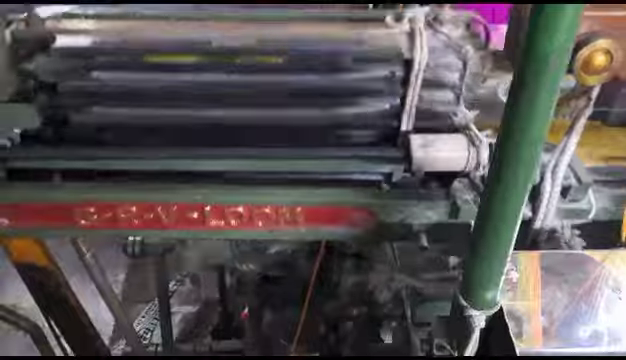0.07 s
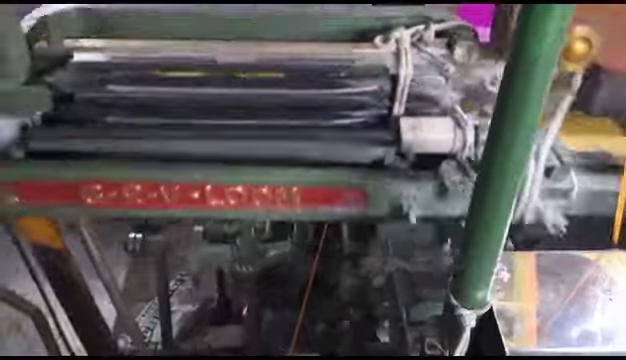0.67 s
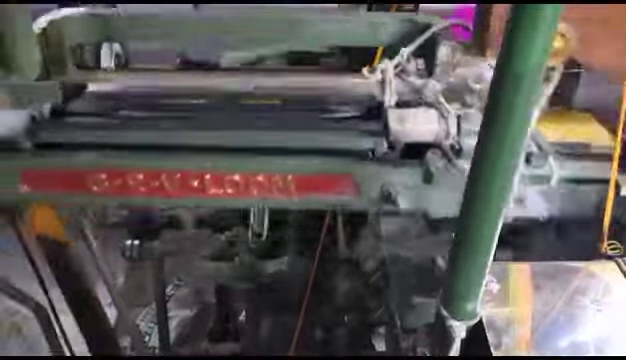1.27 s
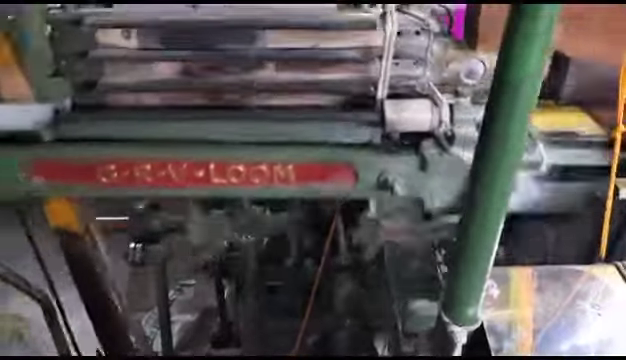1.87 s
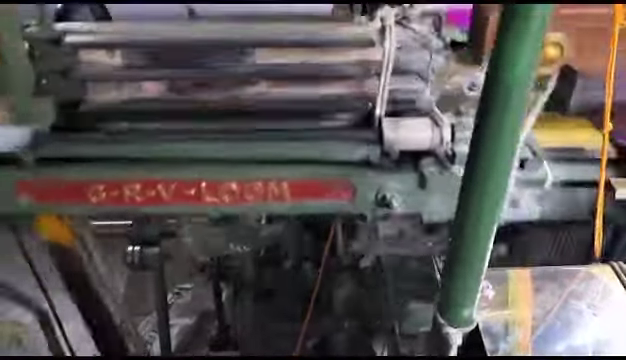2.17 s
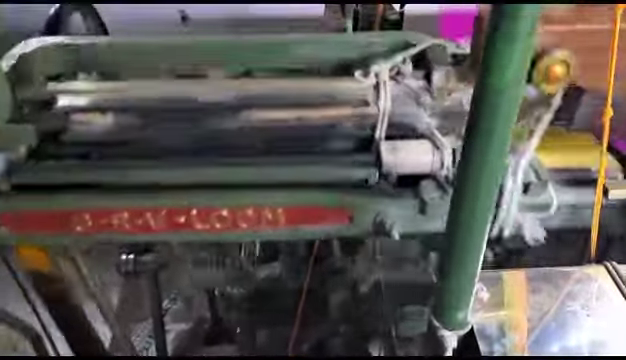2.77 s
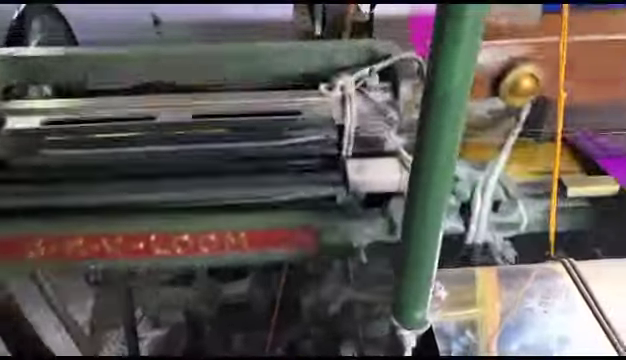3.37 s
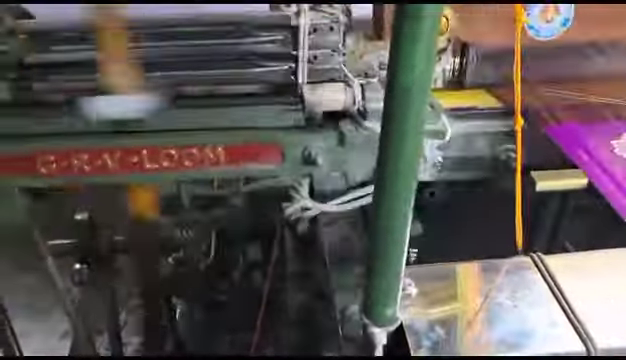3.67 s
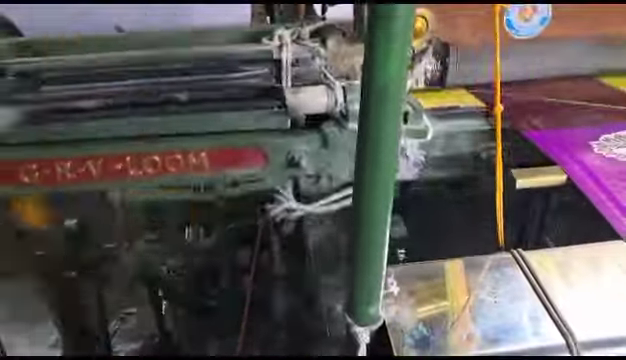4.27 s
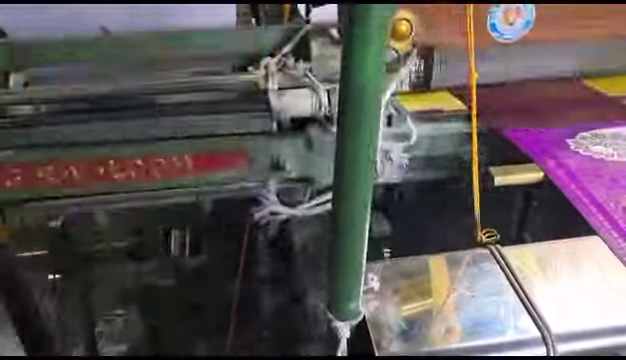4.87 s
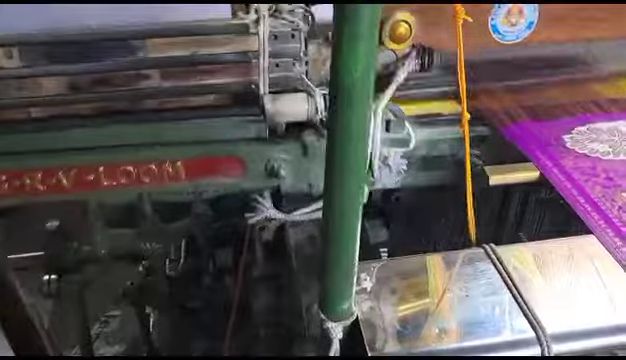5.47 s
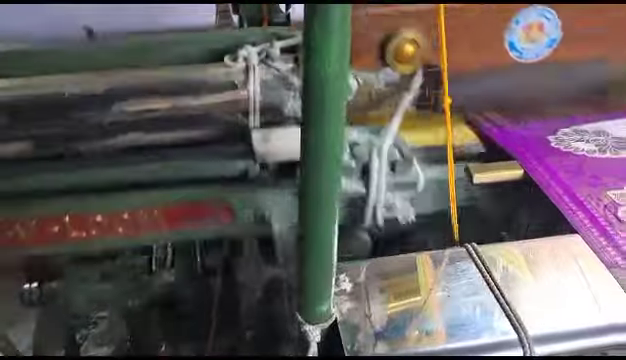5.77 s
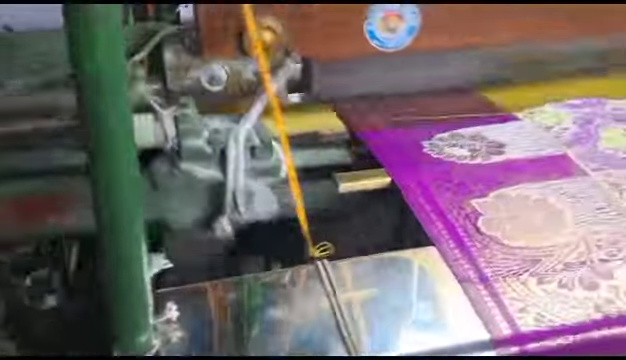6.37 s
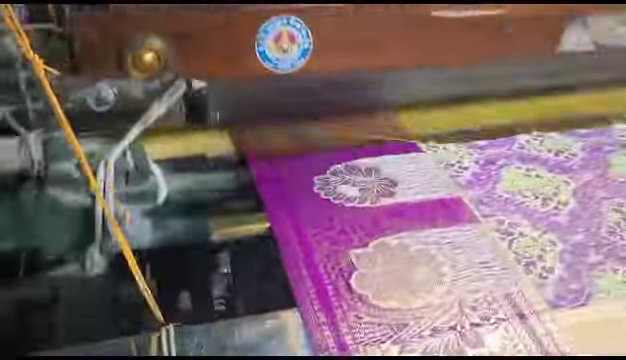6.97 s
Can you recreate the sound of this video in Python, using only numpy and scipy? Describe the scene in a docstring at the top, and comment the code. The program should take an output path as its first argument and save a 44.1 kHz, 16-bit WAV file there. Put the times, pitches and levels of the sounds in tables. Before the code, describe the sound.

A power loom clatters close by in a fast, steady rhythm of metallic clacks and slams over a low machinery rumble.

```python
"""Power loom in a weaving shed

A shuttle loom clatters close by at about 106 picks a minute, between hard walls. Every turn brings a
bright click of the shedding gear, a cam knock, the slam of the picking stick, a latch, and the shuttle's
stop in its box. The gear comes round every three turns and the shuttle changes sides each turn, so the
groove repeats every six. Loose ironwork rattles and rings over the drive's rumble and the shed's din."""
import sys
import numpy as np
from scipy import signal
from scipy.fft import rfft, irfft
from scipy.io import wavfile
from scipy.ndimage import uniform_filter1d

SR = 44100
rng = np.random.default_rng(int(sys.argv[2]) if len(sys.argv) > 2 else 0)


def materialize(psi):
    """Save the field psi as 16-bit PCM at rate SR to the path in sys.argv[1].

    A 1-D psi becomes a single channel; in a 2-D psi each row is a channel.
    """
    bounded = np.clip(np.atleast_2d(psi).T, -1, 1)
    quanta = np.round(bounded * 32767).astype(np.int16)
    wavfile.write(sys.argv[1], SR, quanta)


N = 313992
ROUND_S = 3.386  # six turns of the loom

# slams of the stick: t/s, level/dB, tilt/(dB per octave), crack over tail/dB
PICKS = [(0.366, 3.7, 0.3, -2), (0.924, 3.5, 0.5, 6), (1.4865, 4.3, 0, 1), (2.087, 3.5, -0.3, -11),
         (2.615, 3, -0.75, -2), (3.207, 3.5, -1, -8)]
# their EQ on top of the frame: f/Hz, level/dB
PICK_EQ = [(100, -7.5), (300, -2.2), (800, 1.1), (2000, 0.5), (4200, 3), (7300, 1), (12000, 1.5)]
# stick resonances: f/Hz, width/Hz, lift/dB
PICK_MODES = [(1810, 94, 2.5), (2480, 70, 3.8)]
def picking_stick():
    """The stick slams, throws the shuttle and springs back off its buffer."""
    hits = every(ROUND_S, PICKS + bounces(PICKS, delays_s=.029, gain_db=-5.5, crack_db=-7))
    return blows(hits, PICK_EQ, PICK_MODES, level_db=.17, crack_db=-8.5, crack_s=.01,
                 rise_s=.0014, ring=.97, chatter_db=1.5)


# cam hits: t/s, level/dB, tilt/(dB per octave), crack over tail/dB
KNOCKS = [(0.3154, 2.1, 0.3, 7.5), (0.873, 0.5, 0.2, -2), (1.438, 0.4, 0.8, 9), (2.0415, 1.5, 0.9, -6),
          (2.568, 3, -0.5, -6), (3.162, 3, -0.5, -2)]
# their EQ: f/Hz, level/dB
KNOCK_EQ = [(300, -9), (800, -1.5), (2000, 0), (4200, 3), (7300, -2), (12000, 1.5)]
# cam and lever resonances: f/Hz, width/Hz, lift/dB
KNOCK_MODES = [(2160, 360, .5), (5240, 190, 5.4)]
def cam():
    """The cam knocks against the picking lever just ahead of each slam."""
    return blows(every(ROUND_S, KNOCKS), KNOCK_EQ, KNOCK_MODES, level_db=-1.26, crack_db=-3,
                 crack_s=.0087, rise_s=.0012, ring=1, chatter_db=1.8)


# latch hits: t/s, level/dB, tilt/(dB per octave), crack over tail/dB
LATCHES = [(0.481, -0.5, 1.2, -1), (1.035, 0.9, 0.1, -4), (1.599, -0.7, 1.3, 2), (2.192, 1.3, -0.3, -1),
           (2.724, 0.6, -1.7, -6), (3.313, 1, -1, 4)]
# their EQ: f/Hz, level/dB
LATCH_EQ = [(300, -5.5), (800, -1.3), (2000, -0.7), (4200, 3), (7300, -1), (12000, 2.5)]
# latch resonances: f/Hz, width/Hz, lift/dB
LATCH_MODES = [(1900, 30, 1.9), (12500, 170, 5.5)]
def latches():
    """Levers drop back with a sharp snap while the shuttle flies."""
    return blows(every(ROUND_S, LATCHES), LATCH_EQ, LATCH_MODES, level_db=-.14, crack_db=1,
                 crack_s=.006, rise_s=.00034, ring=1, chatter_db=2)


# shuttle landings: t/s, level/dB, tilt/(dB per octave), crack over tail/dB, bounce delay/s
STOPS = [(0.566, 2.9, -0.96, -11, .028), (1.115, 1.3, -1, -9, 0.042), (1.686, 2, -0.7, -9, .038),
         (2.268, 1.4, 0.5, 0, .027), (2.794, 1.9, 1.3, -8, .028), (3.389, 1.5, 1, -3, .03)]
# their EQ: f/Hz, level/dB
STOP_EQ = [(300, -5.5), (800, -2.5), (2000, 1), (4200, 3.5), (7300, 5.5), (12000, 7)]
# box resonances, shared by the rattles: f/Hz, width/Hz, lift/dB
BOX_MODES = [(1866, 41, 5.3), (3250, 300, 2.9), (5530, 45, 2), (7180, 140, 4.2), (11650, 210, 3)]
SNAG_S = 2.2405
def shuttle_box():
    """The shuttle lands in its box; once it clips the mouth on the way in, with a hard crack."""
    landings = every(ROUND_S, [row[:-1] for row in STOPS])
    snag = (SNAG_S, -.5, .7, 17)  # columns as for a landing
    return blows(landings + [snag], STOP_EQ, BOX_MODES, level_db=-2.5, crack_db=-9, crack_s=.0063,
                 rise_s=.00065, ring=1.13, chatter_db=.8)


# three turns of gear clicks: t/s, level/dB, tilt/(dB per octave), crack over tail/dB
CLICKS = [(0.282, -11.5, -1.1, -12), (0.822, -6.5, -0.8, -12), (1.3826, -8, 0.2, -3)]
# their bright EQ: f/Hz, level/dB
CLICK_EQ = [(300, -6.5), (800, -3.5), (2000, 0), (4200, 7.5), (7300, 13), (12000, 13.5), (14500, 14)]
# gear resonances: f/Hz, width/Hz, lift/dB
CLICK_MODES = [(1432, 16, 7), (2245, 70, 3), (6750, 200, 4), (13500, 250, 7), (14450, 300, 3)]
def shedding_gear():
    """The gear opens the warp with a bright, long-ringing click."""
    return blows(every(ROUND_S / 2, CLICKS), CLICK_EQ, CLICK_MODES, level_db=.5, crack_db=-8,
                 crack_s=.01, rise_s=.0006, ring=1.55, chatter_db=0)


# the loudest rattles: t/s, level/dB, tilt/(dB per octave), crack over tail/dB
RATTLES = [(0.355, -4.5, 0, 5), (1.231, -8.5, 1.1, 5), (2.935, -10, 1.3, -2), (3.107, -12, 3.5, -4),
           (3.437, -7, 1, -6)]
# their EQ: f/Hz, level/dB
RATTLE_EQ = [(300, -4.5), (800, 3), (2000, -1), (4200, -0.5), (7300, 1), (12000, 3)]
def rattles():
    """Loose parts jump, and the shuttle bounces home after each landing."""
    settling = bounces(STOPS, delays_s=[row[-1] for row in STOPS], gain_db=-4.8, crack_db=-5)
    return blows(every(ROUND_S, RATTLES + settling), RATTLE_EQ, BOX_MODES, level_db=-.83,
                 crack_db=1.5, crack_s=.019, rise_s=.0005, ring=1.29, chatter_db=1.5)


# decay of frame and shed, before each part's `ring` factor stretches it: f/Hz, t60/s
RING = [(300, 0.89), (800, 0.84), (2000, 0.94), (4200, 0.59), (7300, 0.57), (12000, 0.41)]
def blows(rows, eq, modes, level_db, crack_db, crack_s, rise_s, ring, chatter_db):
    """Each blow is a dry crack of chattering contact, then a tail in which the treble dies first."""
    size = 24576
    hz, t = np.fft.rfftfreq(size, 1 / SR), np.arange(size) / SR
    body = iron_frame(hz, eq, modes) * dense_modes(hz, spacing_hz=20, depth_db=1.84)
    octaves = np.log2(np.clip(hz, 300, 12000) / 2000)
    centres = [f for f, _ in RING]
    bands = np.array([curve(list(zip(centres, solo)), hz) for solo in np.eye(len(RING))], np.float32)
    decays = np.array([np.exp(-np.log(1000) * t / (t60 * ring)) for _, t60 in RING], np.float32)
    fades = (1 - np.exp(-t / rise_s)) * np.minimum((t[-1] - t) / .08, 1)
    out = np.zeros((2, N))
    for s, db, tilt_db, dry_db in rows:
        tone = body * from_db(tilt_db * octaves) * dense_modes(hz, spacing_hz=70, depth_db=2.5)
        spectrum = (noise_spectrum(size) * tone).astype(np.complex64)
        tail = (irfft(spectrum[:, None] * bands) * decays).sum(1)
        # early bounces and reflections come in clumps; the late tail is smooth
        clumps = from_db(chatter_db * wobble(t, step_s=.0015) * np.exp(-t / .056))
        contact = rng.standard_normal((2, size)) * np.exp(-t / crack_s)
        crack = from_db(dry_db + crack_db) * irfft(rfft(contact) * tone * hz / (hz + 400))
        add(out, s, from_db(db + level_db) * fades * clumps * (tail + crack))
    return out


# base tone of the frame: f/Hz, relative level/dB
IRON_EQ = [(25, -43), (55, -17.5), (130, -11.2), (300, -3.5), (560, -5.5), (850, -4.5), (1200, -4.0),
           (1900, 0.0), (2900, -4), (4400, -4.5), (7000, -9.5), (8600, -21), (12000, -14), (15500, -18.5)]
# frame resonances: f/Hz, width/Hz, lift/dB
FRAME_MODES = [(252, 14, 3), (292, 24, 2.5), (324, 14, 2.5), (400, 90, 2), (660, 20, 3.5), (855, 30, 2.5),
               (935, 50, 1.5), (1250, 30, 2), (1432, 16, 3), (2750, 80, 1.5), (5385, 60, 3),
               (13700, 500, -3), (14750, 700, 3.5)]
def iron_frame(hz, eq, modes):
    """Gain of the iron frame, shaped by one part's EQ and the resonances of both."""
    frame = from_db(curve(IRON_EQ, hz))
    lift_db = sum(db / (1 + (2 * (hz - f) / width) ** 2) for f, width, db in FRAME_MODES + modes)
    return frame / np.sqrt(np.mean(frame ** 2)) * from_db(curve(eq, hz) + lift_db)


def dense_modes(hz, spacing_hz, depth_db):
    """Random peaks and dips: where a part is struck decides which of its many modes ring."""
    heights = rng.standard_normal(2048)
    ripple = np.interp(hz / spacing_hz, np.arange(len(heights)), heights)
    gain = from_db(depth_db * ripple * hz / (hz + 300))
    return gain / np.sqrt(np.mean(gain ** 2))


# close steel contacts: t/s, level/dB
TICKS = [(0.316, -11), (0.4815, -17), (0.8755, -13), (0.9245, -11), (1.16, -12), (1.485, -9), (2.7944, -7),
         (3.389, -10)]
# their glassy EQ: f/Hz, level/dB
TICK_EQ = [(500, -22), (2000, -19), (4500, -2), (7000, 2), (8600, -7), (12000, 11.5), (15000, 3)]
def steel_ticks(level_db, decay_s, rise_s):
    """The nearest steel parts tick dryly; the snag adds a tick and each landing shakes two more loose."""
    shaken = [(s + .045 * rng.gamma(2, .5), rng.normal(-19, 2.5))
              for s, *_ in every(ROUND_S, STOPS) for _ in range(2)]
    size = 2048
    hz, t = np.fft.rfftfreq(size, 1 / SR), np.arange(size) / SR
    envelope = (1 - np.exp(-t / rise_s)) * np.exp(-t / decay_s)
    out = np.zeros((2, N))
    for s, db in every(ROUND_S, TICKS) + [(SNAG_S, -7)] + shaken:
        tone = from_db(curve(TICK_EQ, hz)) * dense_modes(hz, spacing_hz=303, depth_db=-1)
        ringing = irfft(noise_spectrum(size) * tone)
        add(out, s, from_db(db + level_db) * ringing * envelope)
    return out


# short clinks of metal on metal: t/s, f/Hz, level/dB
CLINKS = [(.3165, 2190, -14), (.482, 4450, -15.5), (.925, 4560, -11), (1.037, 4360, -16),
          (1.384, 4740, -17.5), (1.439, 3220, -13), (1.488, 4600, -12), (1.599, 4080, -16),
          (2.0425, 2220, -5.5), (2.268, 910, -13), (2.271, 1380, -16.5), (3.077, 4750, -16)]
# a loose plate or spring, caught squarely, rings on: t/s, f/Hz, level/dB
PINGS = [(.389, 1870, -20), (2.046, 5350, -25), (2.274, 1872, -19.5), (2.65, 5385, -23),
         (2.802, 1870, -18.5)]
def ringing_metal(rows, level_db, swell_s, width_hz):
    """Metal parts meet and ring in a narrow band: the tone swells, wavers and dies away."""
    t = np.arange(SR // 5) / SR
    envelope = t / swell_s * np.exp(1 - t / swell_s)
    out = np.zeros((2, N))
    for s, hz, db in every(ROUND_S, rows):
        waver = uniform_filter1d(rng.standard_normal((2, len(t))), size=40)
        drift = np.cumsum(waver, 1) * np.sqrt(2 * np.pi * width_hz / SR)
        phase = 2 * np.pi * (hz * t + rng.random()) + drift
        add(out, s, from_db(db + level_db) * envelope * np.sin(phase))
    return out


# EQ of the background bed, on top of the frame: f/Hz, level/dB
DIN_EQ = [(30, -8), (60, 1.5), (130, -1), (300, -2.5), (800, -5.5), (2000, -7), (4200, -11.5), (7300, -14),
          (12000, -13.5)]
# humming resonances of the drive: f/Hz, width/Hz, lift/dB
DRIVE_MODES = [(54, 8, 4), (80, 10, 2), (155, 9, 7), (186, 16, -3), (1432, 20, 4)]
def shed_din(level_db, flutter_db):
    """Belt, gears and the rest of the shed: a steady, slightly fluttering roar."""
    hz, t = np.fft.rfftfreq(N, 1 / SR), np.arange(N) / SR
    roar = irfft(noise_spectrum(N) * iron_frame(hz, DIN_EQ, DRIVE_MODES), N)
    return roar * from_db(level_db + flutter_db * wobble(t, step_s=.025))


# how alike left and right are: f/Hz, correlation
LIKENESS = [(60, 0.96), (290, 0.93), (520, 0.66), (820, 0.49), (1050, 0.14), (1300, -0.094), (1500, -0.44),
            (1900, -0.051), (2300, 0.32), (2800, -0.13), (3500, -0.012), (4300, 0.015)]
# the duller right side: f/Hz, level/dB
RIGHT_EQ = [(150, 0.3), (300, -1.7), (900, 0), (2200, 0.67), (3400, -0.5), (5000, -1), (5600, -3.5),
            (6500, -16.5), (7400, -18.5), (8500, -17), (12000, -10.5), (14000, -13.5)]
def stereo_pair(field):
    """Two close microphones share the bass and hear unrelated treble."""
    hz = np.fft.rfftfreq(N, 1 / SR)
    likeness = np.clip(curve(LIKENESS, hz), -1, 1)
    mid, side = rfft(field) * np.sqrt([(1 + likeness) / 2, (1 - likeness) / 2])
    left, right = mid + side, (mid - side) * from_db(curve(RIGHT_EQ, hz))
    return irfft(np.array([left, right]), N)


def every(period_s, rows):
    """Loops the cues with each period of the running machine."""
    end_s = N / SR
    return [(s + k * period_s, *rest) for k in range(-1, int(end_s / period_s) + 1)
            for s, *rest in rows if -.5 < s + k * period_s < end_s]


def bounces(rows, delays_s, gain_db, crack_db):
    """Cues for a weaker second contact after each blow, with half the tilt."""
    return [(s + delay, db + gain_db, tilt_db / 2, crack_db)
            for (s, db, tilt_db, *_), delay in zip(rows, np.broadcast_to(delays_s, len(rows)))]


def add(mix, s, sound):
    """Lays a sound into the mix at time s; it may have begun before time zero."""
    start = round(s * SR)
    sound = sound[..., max(-start, 0):]
    part = mix[:, max(start, 0):][:, :sound.shape[-1]]
    part += sound[..., :part.shape[1]]


def wobble(t, step_s):
    """Glides to a new random value every step."""
    steps = np.arange(0, t[-1], step_s)
    return np.interp(t, steps, rng.standard_normal(len(steps)))


def noise_spectrum(size):
    """Spectra of two unrelated white noises."""
    return rfft(rng.standard_normal((2, size)))


def curve(points, hz):
    """Breakpoints joined by straight lines on a log-frequency axis."""
    f, value = np.transpose(points)
    return np.interp(np.log(hz + 1), np.log(f + 1), value)


def from_db(db):
    """Decibels to gain."""
    return 10 ** (np.asarray(db) / 20)


def scene():
    """The mix: a bed of din, the five strokes of each turn, then rattling, ticking and ringing steel."""
    bed = shed_din(level_db=-1.37, flutter_db=.9)
    clatter = shedding_gear() + cam() + picking_stick() + latches() + shuttle_box() + rattles()
    ticks = steel_ticks(level_db=-1, decay_s=.0023, rise_s=.0003)
    clinks = ringing_metal(CLINKS, level_db=3.5, swell_s=.0012, width_hz=130)
    pings = ringing_metal(PINGS, level_db=2, swell_s=.01, width_hz=14)
    return stereo_pair(from_db(-16) * (bed + clatter) + ticks) + clinks + pings


def record(dry):
    """Master chain: limiter, soft clip, a hard cut in on the running loom, then a low-pass."""
    limit_db, release_db_per_s, start_s, cutoff_hz = -7, 150, .1255, 15800
    t = np.arange(N) / SR
    power_db = 10 * np.log10(abs(uniform_filter1d((dry ** 2).mean(0), size=130)) + 1e-12)
    release_db = t * release_db_per_s
    peak_db = np.maximum.accumulate(power_db + release_db) - release_db
    over_db = np.maximum(peak_db - limit_db, 0)
    limited = dry / from_db(uniform_filter1d(over_db, size=60))
    rounded = limited / (1 + limited ** 6) ** (1 / 6)
    low_pass = signal.firwin(1023, cutoff_hz, window=("kaiser", 9), fs=SR)
    return signal.oaconvolve(rounded * (t >= start_s), low_pass[None], "same")


dry = scene()
out = record(dry)
materialize(out)
```